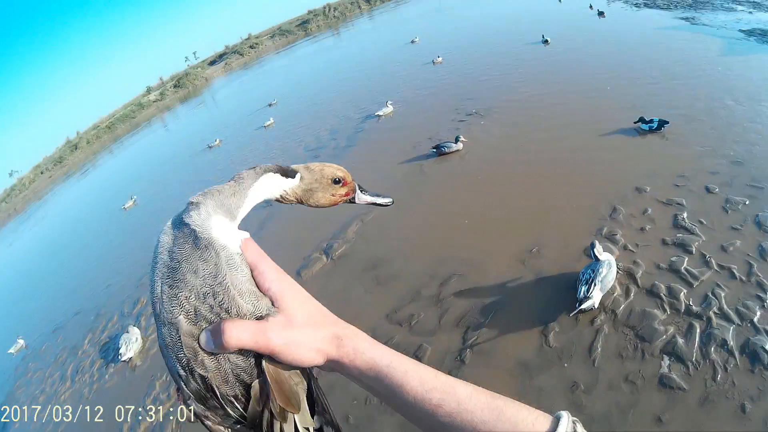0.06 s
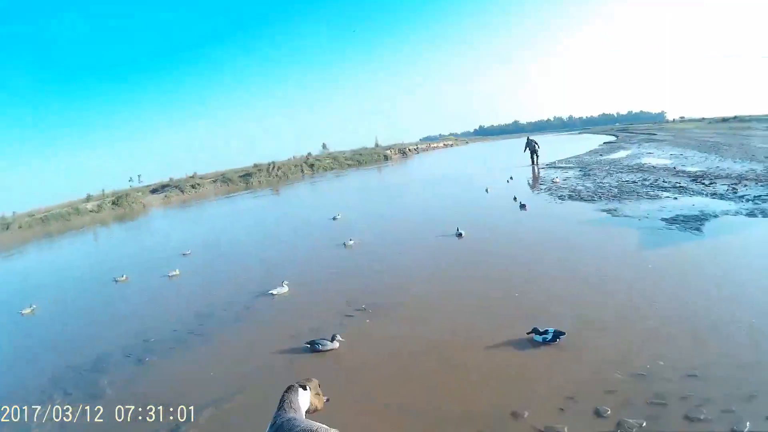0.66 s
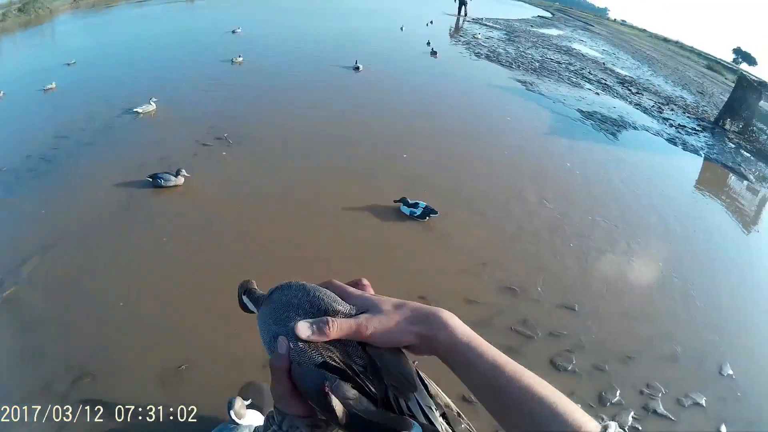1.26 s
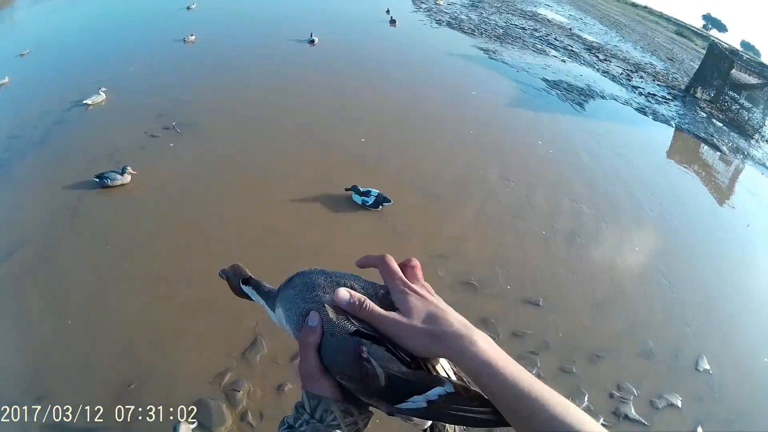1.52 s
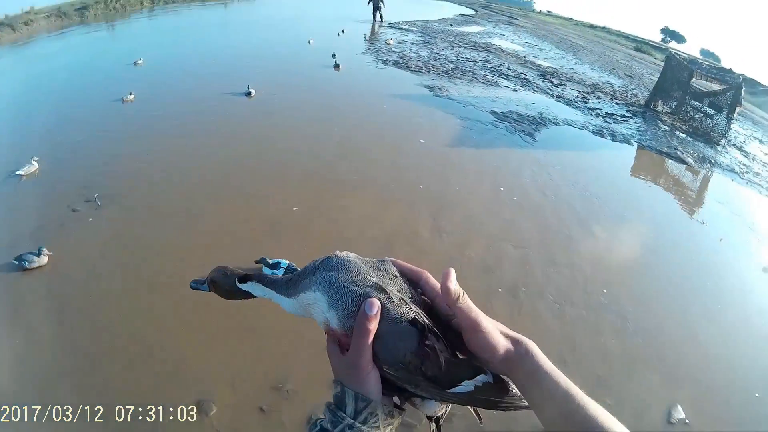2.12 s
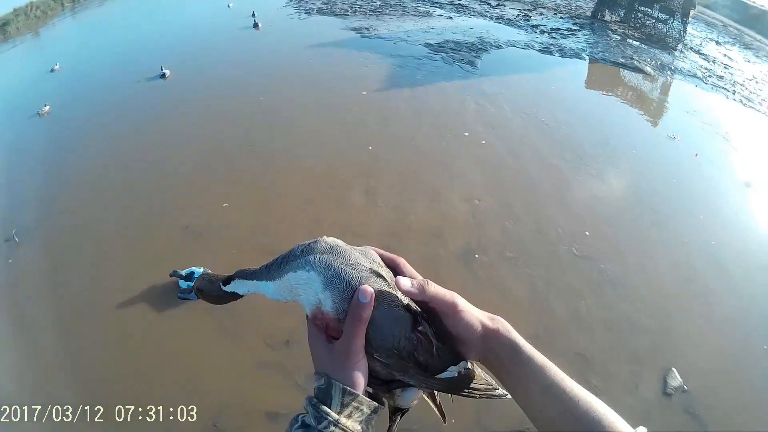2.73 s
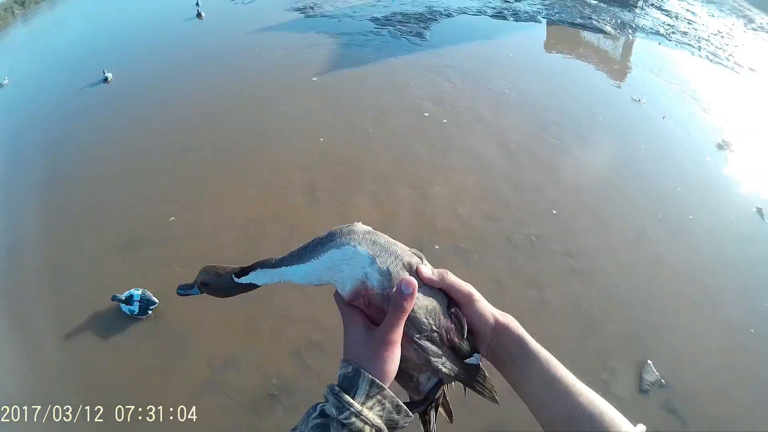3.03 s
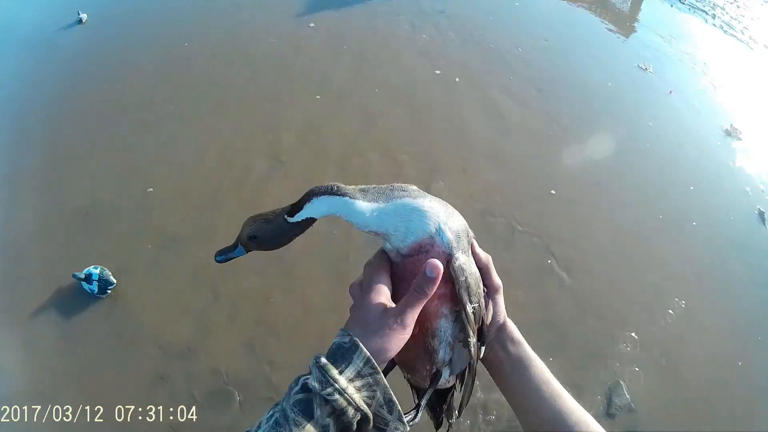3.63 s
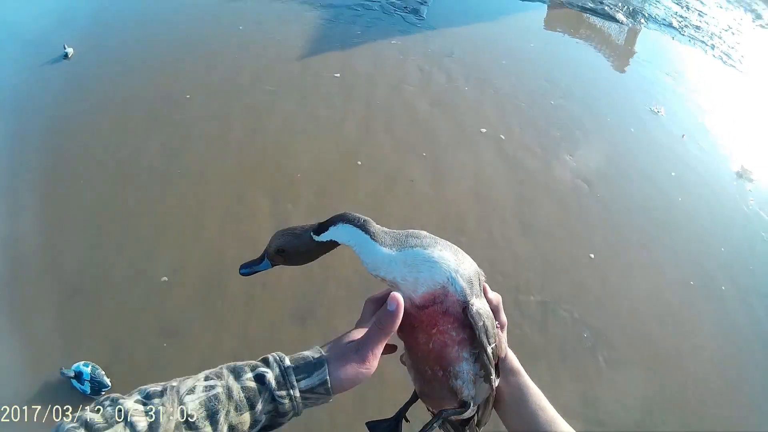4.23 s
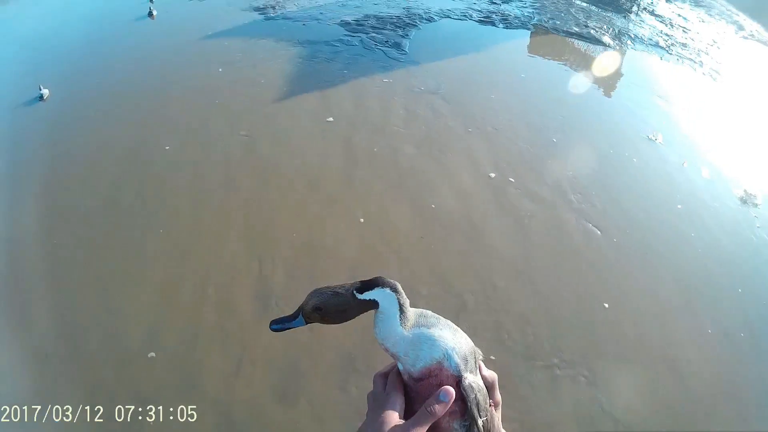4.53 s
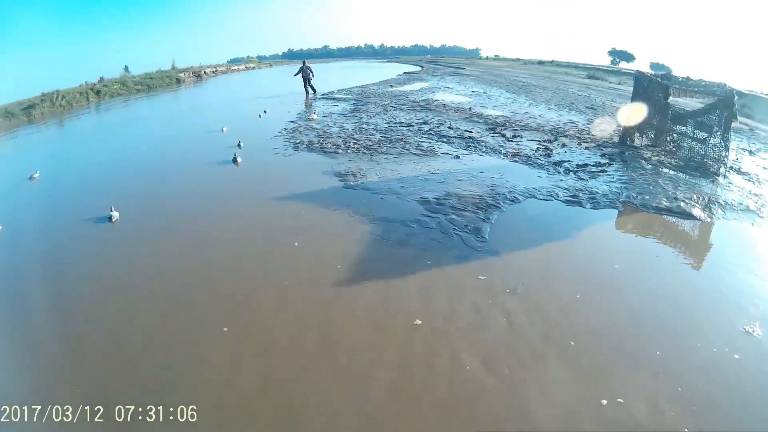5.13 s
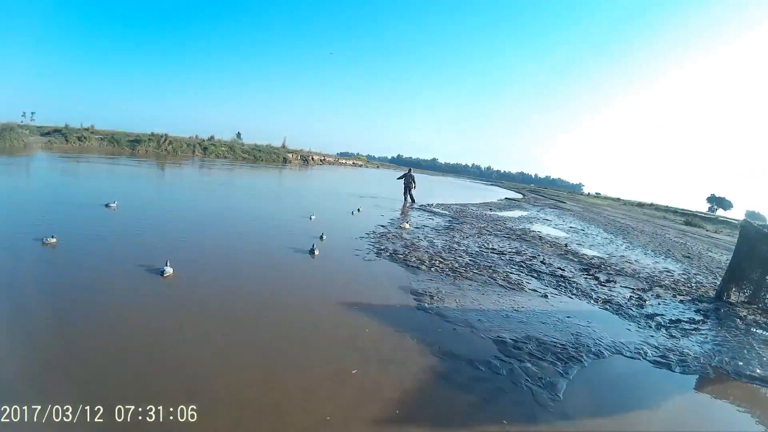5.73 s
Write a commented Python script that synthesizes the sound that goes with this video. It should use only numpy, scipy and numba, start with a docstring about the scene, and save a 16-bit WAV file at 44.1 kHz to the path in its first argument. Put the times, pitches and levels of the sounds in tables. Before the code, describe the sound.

Ducks whistle in overlapping arched calls over a marsh, then trill and rasp hoarsely, thinning to lone whistles in light wind.

```python
"""Ducks over a shallow marsh

Arched syrinx whistles overlap, fluted trills and hoarse rasps from chaotically flapping membranes
take over, then come lone whistles. Mud and banks scatter the calls. A small camera hears them;
its plastic case rings near 2 kHz and is bumped now and then. Light wind buffets it over faint hiss."""
import sys
import numpy as np
from scipy import signal
from scipy.fft import rfft, irfft
from scipy.io import wavfile
from scipy.ndimage import uniform_filter1d
from numba import njit

SR = 44100
rng = np.random.default_rng(int(sys.argv[2]) if len(sys.argv) > 2 else 0)


def put_to_file(sound):
    """Save the sound as 16-bit audio at rate SR, in the file named by the first command-line argument."""
    columns = np.atleast_2d(sound).T  # one column per channel
    safe = np.clip(columns, -1, 1)
    whole_steps = np.round(safe * 32767)
    wavfile.write(sys.argv[1], SR, whole_steps.astype(np.int16))


N = 258548
TIME = np.arange(N) / SR
FREQS = np.arange(N // 2 + 1) * SR / N

# voice spectrum of rasps and flock: f/Hz, gain/dB
VOICE_SPECTRUM = [(900, -35), (1120, -25), (1270, -5), (1390, -8), (1600, -0.5), (2100, 1.5), (2400, -4),
                  (2580, -9.5), (2780, -5), (3000, -8.5), (3200, -5.5), (3380, -18), (3620, -26),
                  (3900, -26), (4600, -51)]


def undb(db):
    """Decibels to gain."""
    return 10 ** (np.asarray(db) / 20)


def unit(x):
    """Scale to rms 1."""
    return x / np.sqrt(np.mean(x ** 2))


def curve(points):
    """Join (t/s, value) points by straight lines."""
    times_s, values = np.transpose(points)
    return np.interp(TIME, times_s, values)


def envelope(start_s, attack_s, length_s, release_s):
    """Rise, hold until length_s after the start, decay."""
    age_s = TIME - start_s
    return np.clip(age_s / attack_s, 0, 1) * np.exp(-np.clip((age_s - length_s) / release_s, 0, 20))


def wander(rate_hz):
    """Random drift, spread near 1."""
    steps = rng.standard_normal(N // 8)
    return np.interp(TIME * rate_hz, np.arange(len(steps)), steps)


def colour(x, points):
    """Filter by (f/Hz, gain/dB) points, falling away beyond the ends."""
    hz, db = np.transpose(points)
    log_hz = np.log(np.r_[hz[0] / 10, hz, hz[-1] * 2])
    gain_db = np.interp(np.log(FREQS + 1), log_hz, np.r_[db[0] - 20, db, db[-1] - 20])
    return irfft(rfft(x) * undb(gain_db), N)


def resonate(x, hz, width_hz, stages=1):
    """Resonance, gain 1 at the centre."""
    for _ in range(stages):
        x = signal.lfilter(*signal.iirpeak(hz, hz / width_hz, fs=SR), x)
    return x


@njit
def formant(x, hz, width_hz):
    """Moving resonance, gain 1 at the centre."""
    y, band, low = np.empty(len(x)), 0., 0.
    for i in range(len(x)):
        g, damping = np.tan(np.pi * hz[i] / SR), width_hz / hz[i]
        v = (band + g * (x[i] - low)) / (1 + g * (g + damping))
        band, low = 2 * v - band, low + 2 * g * v
        y[i] = damping * v
    return y


def scatter(x, t60_s):
    """Dense, decaying reflections."""
    tail = rng.standard_normal(SR) * undb(-60 * TIME[:SR] / t60_s)
    return signal.fftconvolve(x, tail / np.linalg.norm(tail))[:N]


def air(level_db=-63, waver_db=1.1):
    """Low, wavering outdoor murmur under smooth hiss."""
    # ambient spectrum: f/Hz, gain/dB
    spectrum = [(41, -28), (70, 0), (118, -1.5), (148, -1.5), (189, -2.5), (272, -4), (318, -5),
                (547, -9.5), (655, -11.5), (860, -13), (1550, -15), (1810, -20), (9010, -26.5),
                (15500, -29.5)]
    noise = unit(colour(rng.standard_normal(N), spectrum))
    low = signal.sosfiltfilt(signal.butter(2, 900, fs=SR, output="sos"), noise)
    return undb(level_db) * (noise - low + low * undb(waver_db * wander(4.5)))


def wind(breeze_db=-65.5, waver_db=2.5):
    """Eddies press on the microphone: deep, uneven rumble."""
    # gusts: t/s, length/s, level/dB
    gusts = [(0.54, 0.12, -51), (.68, 0.06, -57), (1.055, 0.037, -59), (1.185, 0.036, -52),
             (1.793, 0.12, -56), (1.986, 0.053, -54.5), (2.43, 0.1, -61), (3.122, 0.099, -49),
             (3.244, 0.18, -57), (4.652, 0.038, -50), (4.76, 0.17, -58.5), (5.006, 0.044, -50.5),
             (5.293, 0.044, -62), (5.544, 0.33, -66)]
    gusting = sum(undb(db) * envelope(start_s, .031, length_s, .032) for start_s, length_s, db in gusts)
    strength = np.hypot(gusting, undb(breeze_db + waver_db * wander(6)))
    spectrum = [(12, -5.5), (26, -6), (42, -6), (70, -19.5), (140, -31.5), (400, -52)]
    return strength * unit(colour(rng.standard_normal(N), spectrum))


def bumps(width_share=.61, attack_s=.0011, gain_db=8):
    """Soft, dull contacts with the case and a slosh of water: quick rise, short decay."""
    # bumps and rubs: t/s, f/Hz, decay/s, relative level/dB
    contacts = [(0.521, 1360, 0.0052, -55), (0.723, 474, 0.037, -68.5), (1.202, 624, 0.0043, -56),
                (1.216, 133, 0.015, -60), (4.944, 890, 0.03, -69), (5.025, 438, 0.0058, -58),
                (5.028, 151.7, 0.01, -56.5), (5.128, 1640, 0.063, -69), (5.486, 1292, 0.023, -69),
                (5.528, 880, 0.025, -67.5), (5.607, 2050, 0.0025, -63.5), (5.792, 367, 0.08, -66.5),
                (5.799, 1240, 0.053, -65.5)]
    out = 0
    for time_s, hz, decay_s, db in contacts:
        rub = unit(resonate(rng.standard_normal(N), hz, hz * width_share, stages=2))
        age_s = np.maximum(TIME - time_s + decay_s / 2, 0)
        out += undb(db + gain_db) * rub * (1 - np.exp(-age_s / attack_s)) * np.exp(-age_s / decay_s)
    return out


def marsh_echo(calls, banks_db=-23, mud_db=-13):
    """Near mud scatters a short tail that rings the case; the banks add a thin, long one."""
    # case resonances: f/Hz, width/Hz, gain/dB
    case_modes = [(1265, 44, 11.5), (1580, 23, -8), (1970, 470, 11), (2540, 560, -13.5)]
    mud = scatter(calls, t60_s=.081)
    ringing = sum(undb(db) * resonate(mud, hz, width_hz) for hz, width_hz, db in case_modes)
    return undb(banks_db) * scatter(calls, t60_s=.99) + undb(mud_db) * ringing


def flock(count=70, length_s=.19, crest_hz=2600, spread=.23, arch_depth=.32):
    """Far birds whistle arches at random times and pitches; distance smears them."""
    # flock loudness: t/s, level/dB
    levels = [(.1, -62), (1.0, -70), (1.7, -61.5), (2.4, -82), (2.9, -89)]
    out = np.zeros(N + SR)
    along = np.linspace(0, 1, int(length_s * SR))
    contour = 1 - arch_depth + arch_depth * np.sin(np.pi * np.sqrt(along))
    swell = np.sqrt(np.abs(np.sin(np.pi * along)))
    for k, (moment, pitch) in enumerate(rng.random((count, 2))):
        hz = crest_hz * (1 + spread * (2 * pitch - 1)) * contour
        start = int((k + moment) / count * N)
        out[start:start + len(along)] += swell * np.sin(2 * np.pi * np.cumsum(hz) / SR)
    far = scatter(out[:N], t60_s=.3)
    return undb(curve(levels)) * unit(colour(far, VOICE_SPECTRUM))


def chatter(rough_db=4.5):
    """Ducks mutter roughly through two low throat resonances."""
    # chatter loudness: t/s, level/dB
    levels = [(.1, -77), (.72, -63), (.85, -73.5), (1.45, -73.5), (1.55, -60.5), (1.7, -55), (1.8, -68.5),
              (2.3, -63), (2.9, -75), (4.5, -74.5), (4.8, -78), (5.45, -69.5), (5.86, -77)]
    # throat resonances: f/Hz, width/Hz, gain/dB
    throat_modes = [(1292, 113, -1), (1573, 83, -2)]
    mutter = rng.standard_normal(N) * undb(rough_db * wander(45))
    voice = sum(undb(db) * resonate(mutter, hz, width_hz, stages=2) for hz, width_hz, db in throat_modes)
    return undb(curve(levels)) * unit(voice)


def syrinx_tone(hz, db, jitter, flutter_db, flutter_hz):
    """Pure tone, trembling in pitch and level."""
    phase = 2 * np.pi * np.cumsum(hz * (1 + jitter * wander(350))) / SR
    return np.sqrt(2) * undb(db + flutter_db * wander(flutter_hz)) * np.sin(phase)


def slides(notes, flutter_db, flutter_hz, jitter=.012):
    """Short syrinx notes, each a straight pitch slide."""
    out = 0
    for start_s, length_s, first_hz, last_hz, db in notes:
        hz = np.interp(TIME, [start_s, start_s + length_s], [first_hz, last_hz])
        tone = syrinx_tone(hz, db, jitter, flutter_db, flutter_hz)
        out += envelope(start_s, .005, length_s, .006) * tone
    return out


def weak_slides():
    """Short, weak slides between and after the whistles; the high ones near 0.53 s and 1.48 s sound an octave
    above a whistle's tail. Half direct, half scattered."""
    # weak slides: t/s, length/s, first f/Hz, last f/Hz, relative level/dB
    notes = [(.128, 0.034, 2900, 2680, -58.5), (.33, 0.025, 1520, 1360, -54),
             (.525, 0.014, 3900, 3840, -69), (.55, 0.017, 1750, 1610, -48), (1.075, 0.029, 2360, 2350, -51),
             (1.16, .11, 2530, 2504, -55.5), (1.225, 0.056, 1450, 1233, -66),
             (1.355, 0.0083, 2060, 1997, -49.5), (1.48, 0.061, 4450, 3840, -72.5),
             (4.265, 0.028, 3620, 3760, -72), (4.425, 0.018, 1890, 1754, -45.5),
             (5.419, 0.0084, 1540, 1517, -40.5)]
    tones = slides(notes, flutter_db=3.2, flutter_hz=100)
    return .6 * (tones + scatter(tones, t60_s=.1))


def trills():
    """Fluted notes near 2 kHz with a fast, uneven flutter."""
    # fluted notes: t/s, length/s, first f/Hz, last f/Hz, level/dB
    notes = [(.685, 0.023, 2156, 2053, -48), (.9, 0.022, 2100, 2094, -54.5), (2.15, 0.1, 1970, 2130, -51.5),
             (2.25, 0.0801, 2034, 1954, -42.5), (2.345, 0.076, 1943, 1990, -50),
             (2.538, 0.015, 1947, 1976, -43), (2.566, 0.024, 2050, 2027, -44.5),
             (2.6, 0.081, 2016, 1970, -57.5), (2.856, 0.0264, 2013, 1838, -41.5),
             (2.89, 0.066, 1997, 2000, -55)]
    return slides(notes, flutter_db=2.8, flutter_hz=170)


def membrane(bill_db, low_hz=1000, spacing_hz=72, stray_hz=45, swell_db=5, count=42):
    """Chaotic syrinx: unrelated tones swell and stray, all sharpening as the bill opens."""
    clock_s = np.cumsum(np.exp(.007 * bill_db + .007 * wander(150))) / SR
    out = 0
    for k, (place, offset) in enumerate(rng.random((count, 2))):
        hz = low_hz + spacing_hz * (k + place)
        cycles = hz * clock_s + np.cumsum(stray_hz * wander(28)) / SR + offset
        out += undb(swell_db * wander(30)) * np.sin(2 * np.pi * cycles)
    return unit(out)


def rasp_effort(shut_db=-9, far_bill_db=3, opening_s=.045, fade_db_per_s=8):
    """Level and bill opening in dB: each call fades as the bill opens; the loudest sets the colour."""
    # hoarse calls: t/s, attack/s, length/s, release/s, level/dB, widest bill as treble gain/dB
    calls = [(1.497, 0.032, 0.12, 0.059, -51.5, -3.5), (1.671, .02, .11, 0.044, -51.5, -11),
             (1.829, .03, .14, .02, -56, -1), (2.127, 0.042, 0.27, .1, -47, 1.5),
             (2.538, 0.011, 0.17, 0.025, -49.5, 2), (2.866, .03, 0.2, 0.037, -50, 8.5),
             (3.221, 0.0052, .19, 0.0536, -48, 7.5), (3.598, .006, 0.21, 0.037, -47.5, 3.5),
             (3.965, 0.0056, 0.19, 0.023, -48, 2), (4.39, 0.037, .12, 0.03, -47, 1)]
    # bed of far rasps: t/s, level/dB
    far_levels = [(.1, -74), (.15, -59), (.6, -67), (1.15, -68.5), (2.4, -63), (3.2, -62), (3.9, -64.5),
                  (4.3, -69.5), (4.7, -90.5), (5.1, -77), (5.86, -108)]
    power = undb(curve(far_levels)) ** 2
    weighted_bill = power * far_bill_db
    for start_s, attack_s, length_s, release_s, db, open_db in calls:
        age_s = np.maximum(TIME - start_s, 0)
        strength = undb(db - fade_db_per_s * age_s) * envelope(start_s, attack_s, length_s, release_s)
        bill_db = open_db + (shut_db - open_db) * np.exp(-age_s / opening_s)
        power += strength ** 2
        weighted_bill += strength ** 2 * bill_db
    return 10 * np.log10(power), weighted_bill / power


def rasps(nasal_hz=2150, nasal_db=-6, rise_hz_per_db=24, treble_db=2):
    """Dense rasp; the opening bill raises the nasal resonance and lets out treble."""
    db, bill_db = rasp_effort()
    voice = unit(colour(membrane(bill_db) + .6 * rng.standard_normal(N), VOICE_SPECTRUM))
    throat = signal.sosfiltfilt(signal.butter(5, 2500, fs=SR, output="sos"), voice)
    nasal = formant(voice, nasal_hz + rise_hz_per_db * bill_db, width_hz=380.)
    call = throat + undb(nasal_db - bill_db / 2) * nasal + undb(bill_db + treble_db) * (voice - throat)
    # steady air pressure holds the membrane's swing nearly even
    swing = np.sqrt(signal.fftconvolve(call ** 2, np.hanning(SR // 70), "same"))
    return undb(db) * unit(call / swing ** .7)


def arch(start_s, crest_hz, crest_s, glide_s, tail_s, tail_hz, crest_db, glide_db, tail_db):
    """Pitch and level of a whistle: quick rise, sagging crest, break to a glide, break to a tail."""
    onset_hz, glide_end_hz, break_s = 1568, 2450, .004
    rise_hz_per_s, sink_hz_per_s, fade_db_per_s = 52000, 5250, 71
    flare_hz, flare_width_hz, flare_db = 2094, 94, 9.5
    age_s = np.clip(TIME - start_s, 0, crest_s + glide_s + tail_s)

    rise_s = crest_hz / rise_hz_per_s
    rise_hz = onset_hz + (crest_hz - onset_hz) * (1 - np.maximum(1 - age_s / rise_s, 0) ** 2.4)
    sag = 1 - .0333 * (np.maximum(age_s - rise_s, 0) / .05) ** 1.5
    knots_hz = [onset_hz, flare_hz, flare_hz + 2 * flare_width_hz, (flare_hz + crest_hz) / 2, crest_hz]
    knots_db = [tail_db - 9, tail_db - 2.5, glide_db - 5.5, glide_db - 5.5, crest_db]
    rise_db = np.interp(rise_hz, knots_hz, knots_db)

    along = (age_s - crest_s) / glide_s
    glide_start_hz = 1750 + .33 * crest_hz
    glide_hz = glide_start_hz + (glide_end_hz - glide_start_hz) * along

    tail_age_s = age_s - crest_s - glide_s
    stages = [age_s < crest_s, tail_age_s < 0]
    hz = np.select(stages, [rise_hz * sag, glide_hz], tail_hz - sink_hz_per_s * tail_age_s)
    db = np.select(stages, [rise_db, glide_db + 3 * (along - .5)], tail_db - fade_db_per_s * tail_age_s)
    hz, db = (uniform_filter1d(track, int(break_s * SR) + 1) for track in (hz, db))
    # the tone flares as it crosses the main resonance
    return hz, db + flare_db / (1 + ((hz - flare_hz) / flare_width_hz) ** 2)


def whistles(clear_db=-.73, smear_db=-6, edge_s=.003):
    """Arched syrinx tones; weaker birds sound more broken and scattered."""
    # whistles: t/s, crest f/Hz, rise and crest/s, glide/s, tail/s, tail f/Hz,
    # relative level/dB of crest, glide, tail
    calls = [(0.144, 2830, 0.048, 0.088, 0.057, 2147, -53, -59, -53),
             (0.193, 3900, 0.14, 0.062, .005, 2200, -74, -54, -74),
             (0.361, 3226, 0.086, 0.061, 0.03, 2090, -52.5, -51, -49),
             (0.584, 3280, 0.12, 0.076, 0.034, 2063, -56, -51.5, -48.5),
             (0.795, 3530, 0.09, 0.072, 0.0062, 2200, -78, -57.5, -62),
             (0.946, 2875, 0.13, 0.0046, 0.022, 2450, -48, -51, -53.5),
             (1.077, 2490, 0.056, 0.028, 0.025, 2060, -49.5, -49, -57.5),
             (1.276, 3680, .135, .071, 0.038, 2226, -65.5, -56, -51),
             (1.502, 2900, 0.097, 0.053, 0.055, 2200, -56, -62, -54.5),
             (1.743, 3580, .16, 0.045, 0.053, 2162, -63, -63, -54),
             (1.96, 3700, 0.17, 0.024, 0.0056, 2170, -59.5, -60, -74),
             (2.076, 3190, 0.078, .04, 0.033, 2290, -50, -57.5, -53.5),
             (2.446, 2925, 0.047, 0.00751, 0.012, 2055, -57.5, -57, -54.5),
             (2.603, 3610, .135, .079, 0.03, 2160, -62.5, -52.5, -52),
             (4.061, 3254, 0.1, 0.093, 0.07, 2040, -51, -52, -56),
             (4.228, 2806, 0.098, 0.043, 0.11, 2210, -55.5, -52, -52.5),
             (5.21, 2860, 0.084, 0.057, 0.069, 2200, -50, -47.5, -42),
             (5.462, 2520, 0.036, 0.0081, 0.0081, 2130, -58, -58, -66),
             (5.687, 3190, .069, .056, 0.043, 2123, -59, -45.5, -40.5)]
    clear, smeared = 0, 0
    for call in calls:
        start_s, _, crest_s, glide_s, tail_s, _, *levels_db = call
        weakness = np.clip((-42 - np.mean(levels_db)) / 18, .15, 1)
        tone = syrinx_tone(*arch(*call), jitter=.012 * weakness, flutter_db=3.8 * weakness, flutter_hz=100)
        tone *= envelope(start_s, edge_s, crest_s + glide_s + tail_s, edge_s)
        clear += (1 - weakness ** 2 / 4) * tone
        smeared += weakness ** 2 * tone
    return undb(clear_db) * clear + undb(smear_db) * scatter(smeared, t60_s=.037)


def scene():
    """Birds and their echo, with handling, wind and air; mono."""
    calls = whistles() + weak_slides() + trills() + rasps() + chatter() + flock()
    return (calls + marsh_echo(calls) + bumps() + wind() + air())[None]


def record(dry):
    """The camera opens its microphone after a moment and cuts the top."""
    start_s, top_hz = .088, 15700
    opened = np.clip((TIME - start_s) * SR / 128, 0, 1)
    return signal.sosfilt(signal.ellip(10, .2, 70, top_hz, fs=SR, output="sos"), dry * opened)


dry = scene()
out = record(dry)
put_to_file(out)
```